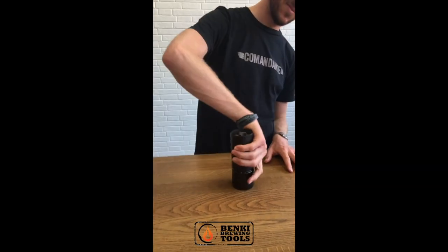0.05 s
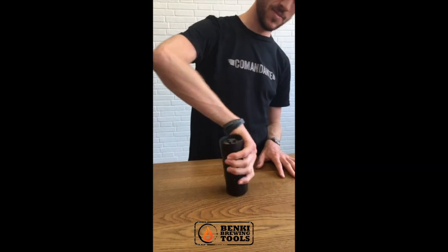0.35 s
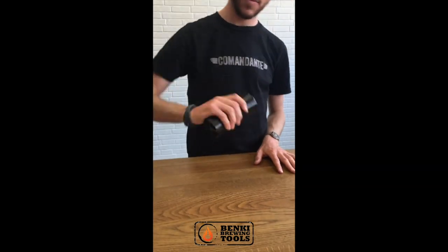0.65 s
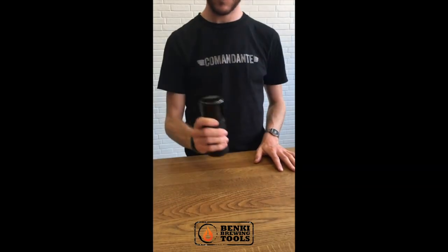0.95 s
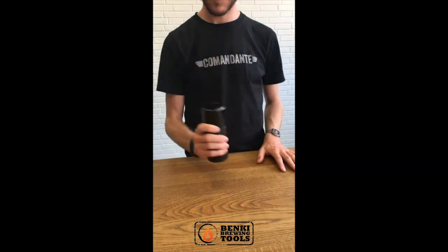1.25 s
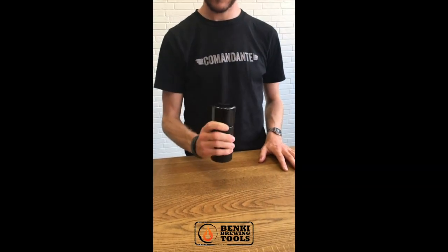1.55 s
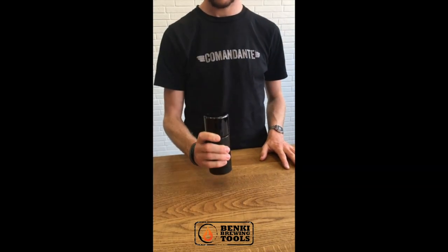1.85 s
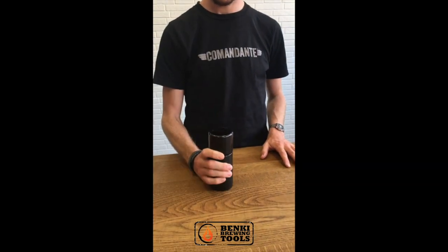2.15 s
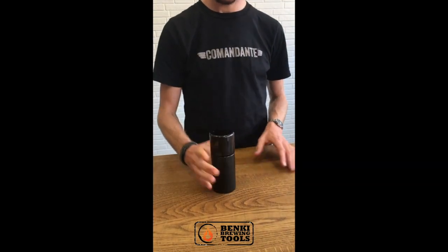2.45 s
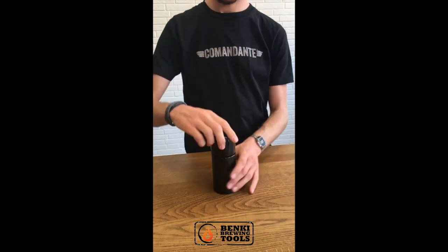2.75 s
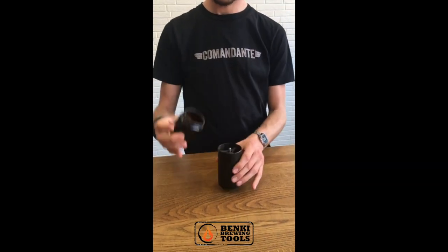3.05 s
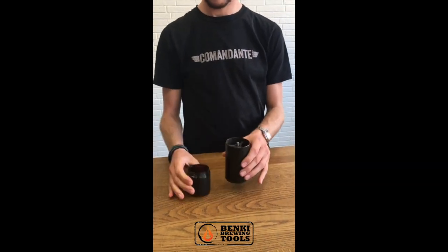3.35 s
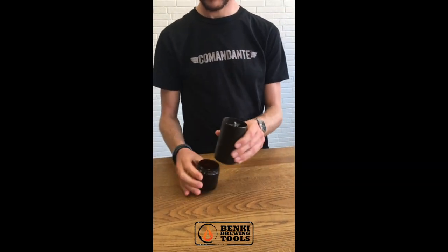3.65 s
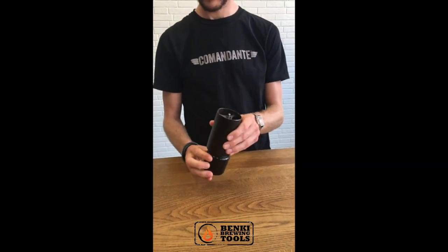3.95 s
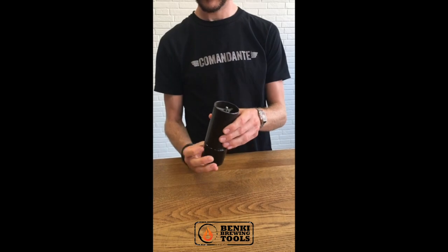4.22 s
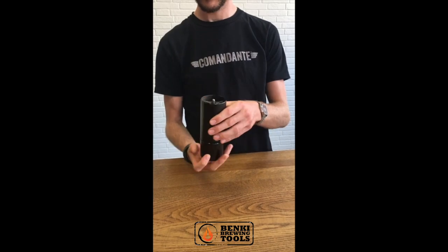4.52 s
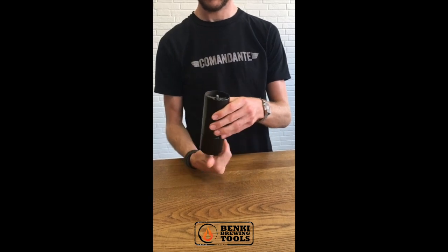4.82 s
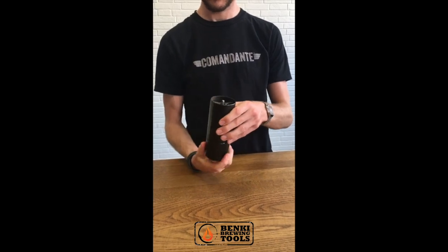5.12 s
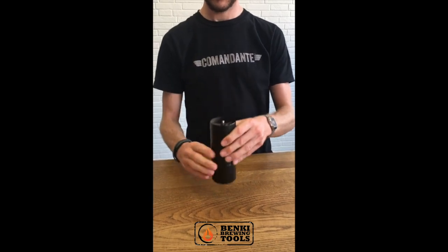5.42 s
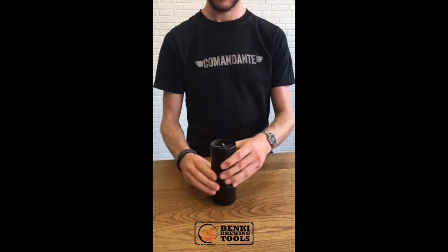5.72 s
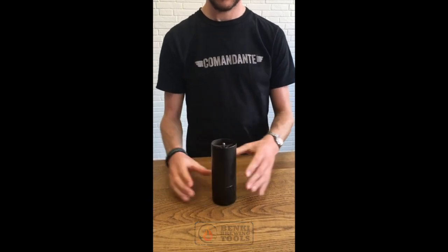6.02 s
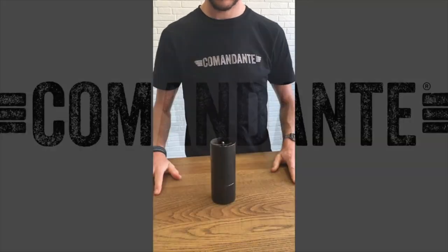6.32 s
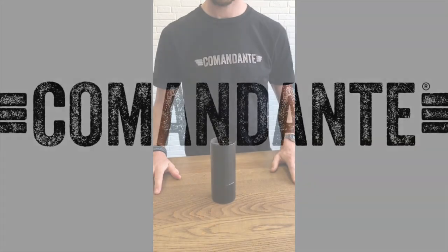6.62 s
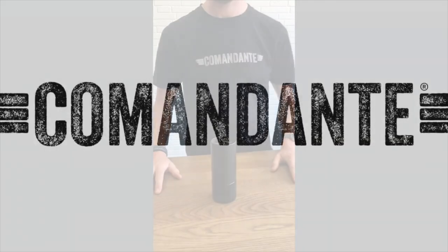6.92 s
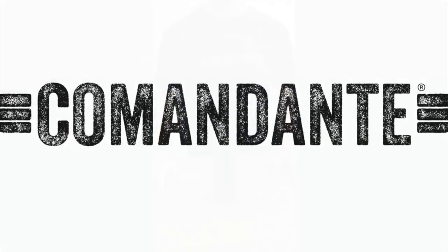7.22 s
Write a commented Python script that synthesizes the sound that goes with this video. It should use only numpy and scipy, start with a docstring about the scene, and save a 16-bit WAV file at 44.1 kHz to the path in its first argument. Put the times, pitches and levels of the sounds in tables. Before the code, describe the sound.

A steel hand coffee grinder knocks lightly on a wooden table, then beans rattle through it in a bright, brief rush and trickle to a stop. Soft knocks follow, and its glass jar clicks loose and is set down. The jar clinks against the ringing steel and screws on with a faint scrape. The grinder lands with a thud. The handling sounds close, in a bare, echoing room with a low rumble.

```python
"""A steel hand coffee grinder is handled on a wooden table in a bare, echoing room.
Knocks make the wood thump and the steel ring. The grinder is tipped so that beans rattle through it,
set down and opened; its glass jar is put on the table, clinked against the body and screwed on.
The whole lands with a thud that shakes its loose parts. Behind it are a low rumble, faint hums and
a distant engine. The sound fades out at the end."""
import sys
import numpy as np
from scipy import signal
from scipy.fft import rfft, irfft, next_fast_len
from scipy.io import wavfile

SR = 44100
rng = np.random.default_rng(int(sys.argv[2]) if len(sys.argv) > 2 else 0)


def dump_mix(stems):
    """Bounce the given channels to the path in sys.argv[1] as a 16-bit WAV at rate SR."""
    frames = np.atleast_2d(stems).T  # one column per channel
    limited = np.clip(frames, -1, 1)  # hard clip at full scale
    pcm = np.round(limited * 32767).astype(np.int16)
    wavfile.write(sys.argv[1], SR, pcm)


N = 320607
LEAD = SR // 4  # extra samples in front: the handling is already under way at time 0
TIME = np.arange(-LEAD, N) / SR
AGE = np.arange(SR // 2) / SR  # seconds since a blow


def from_db(db):
    """Turn decibels into a gain to multiply by."""
    return 10 ** (np.asarray(db) / 20)


def rms_one(x):
    """Scale a sound so that its average strength (rms) is 1."""
    return x / np.sqrt(np.mean(x ** 2) + 1e-20)


def peak_one(x):
    """Scale a sound so that its peak is 1."""
    return x / np.max(np.abs(x))


def at_hz(points, hz):
    """Read between the rows of a table, on a scale where all octaves are equally wide."""
    f, value = np.transpose(points)
    return np.interp(np.log(hz + 0.00087), np.log(f), value)


def add(out, s, sound):
    """Mix a sound in at s seconds."""
    start = max(round(s * SR) + LEAD, 0)
    out[start:start + len(sound)] += sound[:len(out) - start]


def dying(t60, age=AGE):
    """A gain that falls 60 dB in t60 seconds, the 'ring time' of the tables below."""
    return np.exp(-np.log(1000) * age / max(t60, 1e-4))


def swell(s, length, db, attack_s, release_s):
    """A gain that rises 60 dB per attack_s until s, holds for length, then falls 60 dB per release_s."""
    away = np.maximum((s - TIME) / attack_s, (TIME - s - length) / release_s)
    return from_db(db) * dying(1, np.clip(away, 0, 10))


def strokes(rows, attack_s, release_s):
    """Several swells that rise and fall at the same speed."""
    return sum(swell(s, length, db, attack_s, release_s) for s, length, db in rows)


def keep_side(x, side, hz, order):
    """Keep the "low" or "high" side of hz; a higher order cuts more steeply."""
    return signal.sosfilt(signal.butter(order, hz, side, fs=SR, output="sos"), x)


def colour(x, spectrum):
    """Give a sound the tone colour of a table (level at each frequency), fading below its first row."""
    size = next_fast_len(len(x) + SR // 10) * 2
    hz = np.arange(size // 2 + 1) * SR / size
    gain = from_db(at_hz(spectrum, hz)) * np.clip(hz / spectrum[0][0], 1e-2, 1) ** 2
    # a minimum-phase filter: nothing sounds before the click that causes it
    cepstrum = irfft(np.log(gain))
    cepstrum[1:size // 2] *= 2
    cepstrum[size // 2 + 1:] = 0
    return irfft(rfft(x, size) * np.exp(rfft(cepstrum)))[:len(x)]


def resonate(x, hz, width_hz):
    """A resonance: it lets through a narrow band around hz."""
    return signal.lfilter(*signal.iirpeak(hz, hz / width_hz, fs=SR), x + 1e-18)


def sing(x, hz, width_hz):
    """The same resonance twice, for a purer note."""
    return resonate(resonate(x, hz, width_hz), hz, width_hz)


def noise(spectrum):
    """Steady noise with a tone colour, rms 1."""
    return rms_one(colour(rng.standard_normal(len(TIME)), spectrum))


def burst(spectrum, t60, snap):
    """A click (snap sets its share) followed by quickly dying noise, peak 1."""
    age = AGE[:SR // 8]
    push = rng.standard_normal(len(age)) * dying(t60, age)
    push[0] = snap * np.sqrt(np.sum(push ** 2))
    return np.pad(peak_one(colour(push, spectrum)), (0, len(AGE) - len(age)))


def struck(notes, vary_db):
    """A struck object's dying notes, alternating in sign; vary_db varies their levels blow by blow."""
    ring = 0
    for k, (hz, db, t60) in enumerate(notes):
        gain = (-1) ** k * from_db(db + vary_db * rng.standard_normal())
        ring = ring + gain * dying(t60) * np.sin(2 * np.pi * hz * AGE)
    return ring


def grains(per_s, spread_db):
    """Clicks at random times; the further spread_db is from 0, the more their sizes differ."""
    out = np.zeros(len(TIME))
    place, chance, sign = rng.random((int(per_s * len(TIME) / SR), 3)).T
    size = np.minimum(-np.log(1 - chance), 3.5)
    out[(place * len(TIME)).astype(int)] = from_db(spread_db * size) * np.sign(sign - .5)
    return out


# blows on the table: t/s, relative level/dB, treble edge/Hz, bass edge/Hz,
# the object's own note/Hz, its share/dB, relative share of the wood's ring/dB, flexing level/dB
KNOCKS = [(-0.17, -17.5, 1330, 170, 990, -5, 0.5, -37), (0.071, -22.5, 1640, 110, 960, -3.5, -5, -36),
          (2.2052, -29.5, 450, 120, 780, -1, -3, -40), (2.228, -30, 420, 130, 645, 1.5, -3, -58),
          (2.343, -34, 418, 202.5, 339.3, 2, -2.5, -58.5), (3.411, -11.5, 3000, 420, 1135, 0, -9.5, -31.5),
          (3.4163, -19.5, 2100, 400, 540, 6, -9.5, -54.5), (3.4269, -19, 920, 300, 493, 1.5, -13.5, -54.5),
          (5.7285, -11, 410, 100, 560, 1.5, -3, -19.5), (5.744, -19.5, 400, 120, 215, 3, -6, -54)]
# tone colour of the wood's short thump: f/Hz, level/dB
THUMP_COLOUR = [(125, -18.5), (160, 4.5), (450, 4.5), (700, 3), (1100, 2), (1350, -0.5), (1620, 4),
                (2100, -4), (2550, -7), (3000, -16.5), (4500, -16.5), (8000, -26), (16000, -15.5)]
# notes of the table top: f/Hz, level/dB, ring time/s
TABLE_NOTES = [(212.2, 1.5, 0.2), (238.5, -4.5, 0.084), (314.6, -0.5, 0.16), (359.2, -6, 0.32),
               (407, -0.5, 0.16), (449, -1.5, 0.066), (535, -5, .13), (629.5, 2, 0.2), (729, -3, 0.14),
               (816, 0, 0.3), (936, -9, 0.086), (1055, -8, 0.17), (1106.6, 1.5, 0.059), (1272, -1.5, 0.099),
               (1351, -6.5, 0.16), (1575, 1.5, 0.085), (1643, -1.5, 0.052), (1908, -1, 0.12),
               (2200, -3, 0.05), (2522, -15.5, 0.08)]
def table_knocks(spread):
    """A blow makes the top thump, ring and flex; spread gives the smoother sound sent all around."""
    out = np.zeros(len(TIME))
    flex_hz, ring_boost_db = 155.4, 0 if spread else 2.5
    flex = (1 - np.exp(-AGE / 0.005)) * dying(0.28) * np.sin(2 * np.pi * flex_hz * AGE)
    thump_t60, snap = (0.02, 3.0) if spread else (0.044, 0.38)
    for s, db, treble_hz, bass_hz, object_hz, object_db, ring_db, flex_db in KNOCKS:
        thump = rms_one(burst(THUMP_COLOUR, thump_t60, snap))
        ring = rms_one(struck(TABLE_NOTES, vary_db=2.5))
        wood = thump + from_db(ring_db + ring_boost_db) * ring
        wood += from_db(object_db) * resonate(wood, object_hz, object_hz / 3.6)
        wood = keep_side(wood, "low", treble_hz, order=2)  # a softer contact loses treble
        wood = keep_side(wood, "high", bass_hz, order=1)  # a light object loses bass
        wood = keep_side(wood, "high", 125, order=3)  # the top gives off little below its lowest note
        add(out, s, from_db(db - 22.5) * rms_one(wood) + from_db(flex_db) * flex)
    return out


# contacts on the steel body: t/s, tick level/dB, ring level/dB
CLINKS = [(-0.17, -31, -26), (0.004, -42, -49), (0.0656, -28.5, -50), (0.076, -38.5, -52),
          (2.369, -45, -75), (2.3933, -48.5, -82.5), (2.416, -55, -75.5), (3.185, -55.5, -63.5),
          (3.412, -47.5, -49), (3.9197, -30.5, -22.5), (3.93, -43.5, -44), (3.9397, -40, -33),
          (4.053, -26.5, -35), (4.067, -40, -67), (4.0915, -37, -78), (4.752, -42.5, -43),
          (5.053, -54, -69), (5.7253, -35, -61.5)]
# notes of the steel body: f/Hz, level/dB, ring time/s
BODY_NOTES = [(3170, -17, 0.035), (3296, -24.5, 0.24), (3780, -29, 0.11), (4215, 1.5, 0.1),
              (4200, -15, 0.06), (4272, -11, 0.09), (4340, -14.5, 0.05), (5523, -28.5, 0.017),
              (7320, -2.5, .06), (9020, -1, 0.11), (9040, 0, 0.08), (11600, -9, 0.057), (13400, -15.5, .06)]
# tone colour of a hard tick: f/Hz, level/dB
TICK_COLOUR = [(500, -2.5), (1500, 5), (3000, 6), (4500, -0.5), (7000, -1.5), (11000, -10), (14000, -11),
               (16000, -18)]
def steel_clinks():
    """Hard contacts tick and set the steel body ringing, its high notes much more faintly."""
    out = np.zeros(len(TIME))
    split_hz, high_db = 7000, -29
    low_notes = [note for note in BODY_NOTES if note[0] < split_hz]
    high_notes = [note for note in BODY_NOTES if note[0] >= split_hz]
    for s, tick_db, ring_db in CLINKS:
        ring = struck(low_notes, vary_db=-1.0) + from_db(high_db) * struck(high_notes, vary_db=4.5)
        tick = burst(TICK_COLOUR, t60=0.013, snap=0.35)
        add(out, s, from_db(tick_db) * tick + from_db(ring_db) * ring)
    return out


# how long the echo lasts: f/Hz, ring time/s
ECHO_TIMES = [(100, 1.5), (260, 1.59), (700, 1.55), (1800, 2), (4300, 1.5), (8000, 0.5), (15000, 0.76)]
# how loud the echo is against the sound that feeds it: f/Hz, level/dB
ECHO_LEVELS = [(60, -11), (160, -1.5), (500, -3.5), (1200, -1.5), (2200, -6.5), (4300, -10), (7000, -10.5),
               (15000, -12)]
def room_echo(x):
    """Hard walls blur a sound into an echo that dies at its own rate in each half octave."""
    age = np.arange(2 * SR) / SR
    white, response = rng.standard_normal((2, len(age))), 0
    edges = 60 * 2 ** (np.arange(17) / 2)
    for k, (low, high) in enumerate(zip(edges, edges[1:])):
        hz = np.sqrt(low * high)
        band = signal.sosfilt(signal.butter(2, [low, high], "band", fs=SR, output="sos"), white[k % 2])
        tail = band * dying(at_hz(ECHO_TIMES, hz), age) * (1 - np.exp(-age / 0.0028))
        tail *= np.sqrt(2 * (high - low) / SR / np.sum(tail ** 2))  # same energy per Hz in every band
        response = response + from_db(at_hz(ECHO_LEVELS, hz)) * tail
    return signal.fftconvolve(x, response)[:len(x)]


# swells of the room's rumble: t/s, length/s, level/dB
RUMBLE_SWELLS = [(3.7, 1, -67), (5.7, 0.36, -63.5)]
# tone colours of the rumble and of the air's soft rush: f/Hz, level/dB
RUMBLE_COLOUR = [(20, -21), (40, -0.5), (52, 2), (61, 15.5), (80, -11.5), (108, 9), (135, -10.5),
                 (250, -52)]
AIR_COLOUR = [(100, 7.5), (300, -12.5), (700, -12.5), (1500, -13), (3000, -24.5), (6000, -31.5),
              (14000, -35.5), (15000, -40), (15500, -57)]
def room_noise():
    """A soft rush of air and a low rumble, steady but for two swells."""
    steady = from_db(-62.5)
    rumble = (steady + strokes(RUMBLE_SWELLS, attack_s=0.92, release_s=2.3)) * noise(RUMBLE_COLOUR)
    return rumble + steady * noise(AIR_COLOUR)


# tone colour of a bean hitting the hopper, the cup that holds the beans: f/Hz, level/dB
HOPPER_COLOUR = [(900, -25.5), (1700, -2.5), (2400, -5), (3400, -7), (4500, -1), (5100, -4.5), (5850, 2),
                 (6900, -3), (8400, 0.5), (9500, -3.5), (10900, -4), (12200, -7.5), (13500, -11),
                 (16000, -10.5)]
def bean_click():
    """One hard bean hits the hopper; it is too light to make low sounds."""
    return keep_side(burst(HOPPER_COLOUR, t60=0.012, snap=0.5), "high", 2800, order=3)


# single beans tip against the steel wall: t/s, level/dB, treble tilt/(dB per octave)
PINGS = [(0.004, -56, 0), (0.066, -44, -8), (0.6076, -39.5, 2), (0.642, -46.5, -1), (0.703, -44.5, -3),
         (0.769, -51, 9), (0.82, -33, 4), (0.845, -36, 2), (0.865, -35.5, -2.5), (0.882, -35.5, -1)]
# notes of the wall, damped by the hand: f/Hz, level/dB, ring time/s
WALL_NOTES = [(3540, -4, 0.008), (4300, 0.5, 0.03), (4610, 0, 0.021), (6620, -18.5, 0.023),
              (8200, -25, 0.025), (10680, -0.5, 0.022), (11040, 1, 0.022), (13500, -6, 0.028),
              (15500, -14, .02)]
def bean_pings():
    """Each bean clicks on another spot of the wall, so the wall rings at slightly different pitches."""
    out = np.zeros(len(TIME))
    for s, db, tilt_db in PINGS:
        notes = [(hz * (1 + 0.005 * rng.standard_normal()), note_db + tilt_db * np.log2(hz), t60)
                 for hz, note_db, t60 in WALL_NOTES]
        ring = peak_one(struck(notes, vary_db=3.5))
        add(out, s, from_db(db) * (ring + from_db(-4.5) * bean_click()))
    return out


POUR_START_S, POUR_END_S, POUR_ATTACK_S = 0.885, 1.415, 0.16
# clumps of beans break loose: t/s, length/s, level/dB
SURGES = [(0.97, 0.072, -52), (1.04, 0.065, -58.5), (1.125, 0.062, -59), (1.235, 0.044, -53),
          (1.32, 0.021, -48.5), (1.395, 0.027, -54.5)]
def bean_flow():
    """How loud the stream is: a few beans creep ahead, the rest pour in surges, the last trickle."""
    creep_s = 0.29
    creep = swell(POUR_START_S - creep_s, creep_s, -77.5, POUR_ATTACK_S, release_s=0.06)
    pour = swell(POUR_START_S, POUR_END_S - POUR_START_S, -49, POUR_ATTACK_S, release_s=0.06)
    trickle = swell(POUR_END_S, 0, -62.5, POUR_ATTACK_S, release_s=0.73)
    return creep + pour + strokes(SURGES, attack_s=0.042, release_s=0.069) + trickle


# lowest note of the hollow around the beans, which changes size as they slide: t/s, f/Hz
HOLLOW_PITCH = [(0.85, 3100), (1.17, 1750), (1.45, 2780)]
# notes of the hopper: f/Hz, width/Hz, level/dB
HOPPER_NOTES = [(2500, 110, -7.5), (3740, 160, -15.5), (4520, 140, 0.5), (5950, 140, -5.5), (11030, 180, 2),
                (13480, 199, 0)]
def bean_stream():
    """Sliding beans collide, each ringing briefly at its own pitch, and the hopper rings along."""
    lowest_hz, stream = np.interp(TIME, *np.transpose(HOLLOW_PITCH)), 0
    for hz in np.geomspace(1700, 15000, num=40):
        carried = np.minimum(hz / lowest_hz, 1) ** 7  # the hollow passes little below its lowest note
        collisions = resonate(grains(per_s=280, spread_db=4.5), hz, width_hz=230)
        stream = stream + carried * collisions * hz ** 0.5
    stream = colour(stream, HOPPER_COLOUR)
    ring = sum(from_db(db) * resonate(stream, hz, width) for hz, width, db in HOPPER_NOTES)
    return bean_flow() * rms_one(stream + ring)


def bean_jingle():
    """The first beans of the stream skid along the bare wall and make it ring until they cover it."""
    jingle = sum(from_db(db) * resonate(grains(per_s=160, spread_db=3.5), hz, width_hz=130)
                 for hz, db, _ in WALL_NOTES)
    return swell(POUR_START_S, 0, -50.5, POUR_ATTACK_S, release_s=0.87) * rms_one(jingle)


# the loudest single beans landing: t/s, level/dB, f/Hz
BEAN_DROPS = [(0.9527, -29.5, 9230), (0.9757, -30.5, 5700), (0.9903, -29.5, 5900), (1.0724, -26.5, 6000),
              (1.131, -26.5, 5900), (1.1497, -25.5, 5650), (1.207, -30, 4720), (1.243, -28.5, 5850),
              (1.267, -28, 5830), (1.3053, -31, 4860), (1.3224, -29, 5900), (1.3782, -25, 8340),
              (1.3972, -26.5, 5700), (1.4021, -29.5, 4520), (1.4671, -38, 5720), (1.49, -27.5, 6150),
              (1.509, -29, 6940), (1.564, -39.5, 6300), (1.5943, -37.5, 5730), (1.614, -35.5, 4420),
              (1.6274, -38.5, 6200), (1.653, -35, 7200), (1.6818, -39.5, 7000), (1.719, -37.5, 6250),
              (1.7264, -44, 6090), (1.761, -42, 8650), (1.7678, -42.5, 6290)]
def bean_drops():
    """Single beans land during and after the stream, each click with a pitch of its own."""
    out = np.zeros(len(TIME))
    for s, db, hz in BEAN_DROPS:
        click = bean_click()
        add(out, s, from_db(db) * peak_one(click + 2.5 * resonate(click, hz, width_hz=230)))
    return out


# faint low hums: t/s, length/s, f/Hz, level/dB
HUMS = [(1.18, 0.14, 105.4, -59), (1.188, 0.17, 209, -62.5), (1.29, 0.08, 314, -65),
        (1.532, 0.15, 285.8, -61.5), (6.452, 0.094, 258.6, -55), (6.47, 0.1, 124.1, -56.5),
        (6.803, 0.3, 52.1, -54)]
def hums():
    """Faint low tones swell and die away."""
    return sum(swell(s, length, db, attack_s=0.35, release_s=0.87) * np.sin(2 * np.pi * hz * TIME)
               for s, length, hz, db in HUMS)


# the jar is jogged, pulled off or put back: t/s, level/dB, starting f/Hz, ring time/s
PUFFS = [(1.441, -53, 498, 0.082), (2.776, -35.5, 480, 0.041), (3.9195, -25, 872, 0.084),
         (3.9405, -23, 835, 0.094), (4.054, -24.5, 740, 0.075), (4.0915, -21.5, 660, 0.019),
         (4.683, -42, 320, 0.054), (4.751, -42, 770, 0.11), (4.845, -36, 412, 0.059),
         (4.864, -39.5, 1300, 0.059)]
def jar_air():
    """The air in the jar rings, dropping in pitch as the gap closes."""
    out = np.zeros(len(TIME))
    onset = 1 - np.exp(-AGE / 0.0011)  # the air takes a moment to get moving
    glide = 1 - 0.19 * (1 - np.exp(-AGE / 0.026))
    for s, db, hz, t60 in PUFFS:
        tone = np.sin(2 * np.pi * np.cumsum(hz * glide) / SR)
        add(out, s, from_db(db) * onset * dying(t60) * tone)
    return out


# the hands shift their grip, and at last slide off: t/s, length/s, level/dB
GRIPS = [(1.47, 0.18, -68.5), (2.8, 0.038, -54.5), (4.38, 0.014, -58.5), (4.72, 0.15, -64.5),
         (6.25, 0.15, -68)]
RUBS = [(6.09, 0.067, -72), (6.225, 0.016, -69.5), (6.305, 0.013, -63)]
# tone colours of the grip and of sliding skin: f/Hz, level/dB
GRIP_COLOUR = [(100, -1.5), (170, -3), (350, 4), (700, -13.5), (1400, -17.5), (3000, -43)]
SKIN_COLOUR = [(1500, 11), (4000, 3.5), (9000, -1), (13000, -1), (16000, -7)]
def hands():
    """The grip makes a dull shuffle that never quite stops; skin hisses as it brushes the steel."""
    shuffling = from_db(-73.5) + strokes(GRIPS, attack_s=0.93, release_s=1.0)
    brushing = strokes(RUBS, attack_s=0.118, release_s=0.3)
    return brushing * noise(SKIN_COLOUR) + shuffling * noise(GRIP_COLOUR)


# notes of the glass jar: f/Hz, level/dB, ring time/s
JAR_NOTES = [(1450, 0.5, .03), (1520, -1, .09), (2093, -2.5, 0.013), (3570, -1.5, 0.011), (4500, 3, 0.02),
             (5730, 5.5, 0.014), (6090, -2.5, 0.025), (7460, -10, 0.05), (11070, -10.5, 0.054)]
def jar_loosens(s):
    """The jar clicks as it comes loose, and its thread leaves a rough, wavering ring."""
    out = np.zeros(len(TIME))
    click = struck(JAR_NOTES, vary_db=0) + 1.3 * burst(TICK_COLOUR, t60=0.018, snap=0.2)
    add(out, s, from_db(-43.5) * click)
    age = np.arange(SR) / SR
    wavering = rms_one(sing(rng.standard_normal(len(age)), hz=4434, width_hz=90))
    add(out, s, from_db(-66) * wavering * dying(1.1, age))
    return out


# high notes of the glass: f/Hz, level/dB, ring time/s
JAR_HIGH_NOTES = [(4200, -0.5, .6), (6440, 10.5, .03), (7500, -5.5, 0.2), (9100, 1, 0.27)]
def jar_ping(s):
    """The glass rings as it meets the table."""
    out = np.zeros(len(TIME))
    add(out, s, from_db(-65.5) * struck(JAR_HIGH_NOTES, vary_db=-1.5))
    return out


# a distant engine slowly speeds up: t/s, f/Hz, level/dB
ENGINE = [(3.45, 50, -78), (3.7, 52.6, -51), (3.95, 53.76, -63), (4.15, 56.8, -50), (4.4, 58.06, -56),
          (4.7, 61.8, -49), (4.95, 62.4, -55.5), (5.15, 65.9, -61.5), (5.5, 70.8, -65), (5.9, 71, -78)]
def engine():
    """Only the engine's lowest note and its octave come through the walls, each wavering in level."""
    times, hz, db = np.transpose(ENGINE)
    phase = 2 * np.pi * np.cumsum(np.interp(TIME, times, hz)) / SR
    steps_s = np.arange(-1, 8, 0.09)
    wobbles_db = 2.9 * rng.standard_normal((2, len(steps_s)))
    low, octave = (from_db(np.interp(TIME, steps_s, wobble)) for wobble in wobbles_db)
    tone = low * np.sin(phase) + from_db(-7.5) * octave * np.sin(2 * phase)
    return from_db(np.interp(TIME, times, db)) * tone


# scrapes of the jar's rim: t/s, length/s, level/dB
GRATES = [(3.921, 0.025, -41), (4.053, 0.008, -56.5)]
# tone colour of the rim: f/Hz, level/dB
RIM_COLOUR = [(900, 5), (1400, 11), (1800, 7), (2400, 3), (3100, 8), (4300, -8.5), (5500, -20),
              (7500, -12.5), (13000, -24.5), (16000, -25)]
def rim_grates():
    """The rim grates on the body in a rush of tiny clicks as the jar finds its seat."""
    scrape = rms_one(colour(grains(per_s=3400, spread_db=1.0), RIM_COLOUR))
    return strokes(GRATES, attack_s=0.006, release_s=0.15) * scrape


# twists of the jar on its thread: t/s, length/s, level/dB
TWISTS = [(4.295, 0.048, -67.5), (4.39, 0.054, -60.5), (4.765, 0.089, -50.5)]
# tone colour of the thread: f/Hz, level/dB
THREAD_COLOUR = [(300, 13.5), (700, 10.5), (1400, 3.5), (2500, -4.5), (4200, 0.5), (6200, -5), (8500, 0),
                 (13000, -3.5), (16000, -11)]
# notes of the body that the thread sets off: f/Hz, width/Hz, level/dB
THREAD_NOTES = [(4262, 110, 24.5), (4390, 220, 14), (13000, 1500, -15)]
def screw_thread():
    """The thread slips in tiny steps and catches on grit, which keeps the body singing roughly."""
    catches = grains(per_s=340, spread_db=-0.5)
    crunch = rng.standard_normal(len(AGE)) * dying(0.0074)
    grit = rms_one(signal.fftconvolve(catches, crunch)[:len(TIME)])
    slips = rms_one(grains(per_s=3000, spread_db=1.5))
    friction = strokes(TWISTS, attack_s=0.2, release_s=0.16) * rms_one(slips + grit)
    ring = sum(from_db(db) * sing(friction, hz, width) for hz, width, db in THREAD_NOTES)
    return colour(friction, THREAD_COLOUR) + ring


# notes of the grinder's frame: f/Hz, level/dB, ring time/s
FRAME_NOTES = [(626, 0.5, 0.13), (1139, -11, 0.12), (1360, -4.5, 0.057), (1523, -9.5, 0.045),
               (1880, 0.5, 0.035), (1985, -6.5, .035)]
# tone colour of the loose parts: f/Hz, level/dB
LOOSE_COLOUR = [(1200, 8), (1700, -1), (1900, -6), (2150, 4.5), (3400, 3), (5500, -8.5), (7300, -11),
                (8300, -12), (11400, -21.5), (13300, -17.5), (16000, -32)]
# notes of the thin ring after the landing: f/Hz, width/Hz, level/dB
SHIMMER_NOTES = [(7200, 72.6, 5), (9150, 100, -7), (9960, 30, 3), (11360, 35, -1), (13200, 60, -3)]
def landing(s):
    """The grinder lands: its frame clacks, loose parts jump and shudder, and a thin ring hangs on."""
    chatter = rms_one(colour(grains(per_s=5900, spread_db=4.0), LOOSE_COLOUR))
    jolt = swell(s, 0, db=-49.5, attack_s=0.003, release_s=0.037)
    shudder = swell(s, 0, db=-48.5, attack_s=0.003, release_s=0.63)
    fine_clicks = grains(per_s=4100, spread_db=1.5)
    ring = rms_one(sum(from_db(db) * sing(fine_clicks, hz, width) for hz, width, db in SHIMMER_NOTES))
    ring_gain = swell(s + 0.055, 0, db=-65, attack_s=0.27, release_s=0.75) * (TIME > s)
    out = (jolt + shudder) * chatter + ring_gain * ring
    add(out, s, from_db(-30) * struck(FRAME_NOTES, vary_db=0))
    return out


def scene():
    """Mix the handling, its echo and the quiet background into one channel."""
    knocks = table_knocks(spread=False)
    glass = jar_loosens(s=2.746) + jar_ping(s=3.4107) + rim_grates() + jar_air()
    beans = bean_stream() + bean_jingle() + bean_drops() + bean_pings()
    metal = steel_clinks() + landing(s=5.7265) + screw_thread() + hands()
    to_walls = table_knocks(spread=True)
    to_walls += from_db(0.5) * metal + from_db(-7.0) * glass + from_db(2.5) * beans
    echo = room_echo(to_walls)
    background = room_noise() + hums() + engine()
    return (knocks + glass + beans + metal + echo + background)[None, LEAD:]


def record(dry):
    """Fade out the end and cut the very highest treble."""
    fade_s, cutoff_hz = 0.71, 15900
    fade = np.minimum((N - np.arange(N)) / SR / fade_s, 1) ** 1.55
    return signal.sosfilt(signal.ellip(10, .1, 80, cutoff_hz, fs=SR, output="sos"), dry * fade)


dry = scene()
out = record(dry)
dump_mix(out)
```